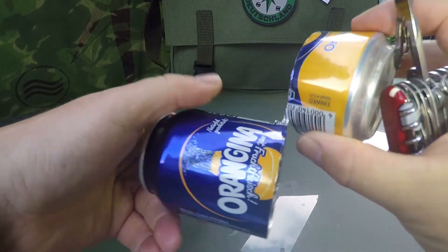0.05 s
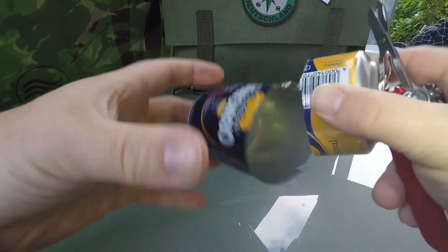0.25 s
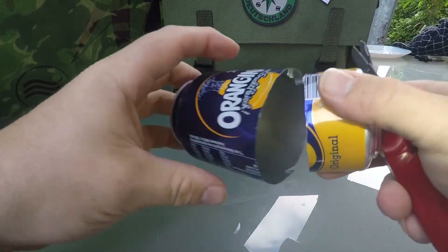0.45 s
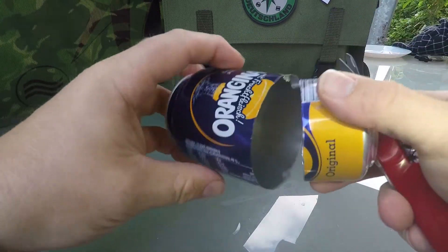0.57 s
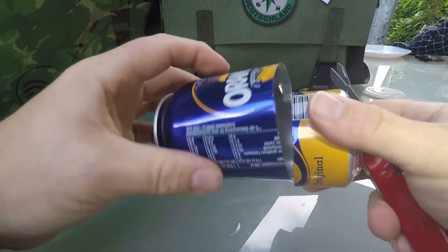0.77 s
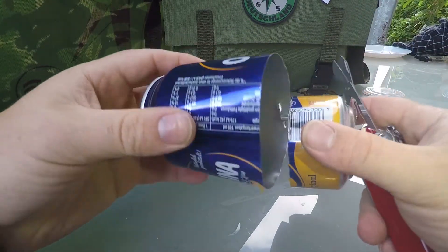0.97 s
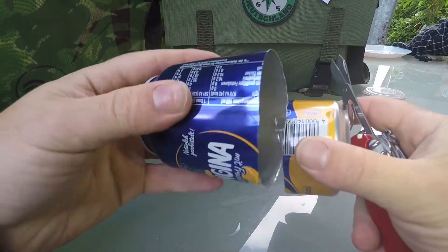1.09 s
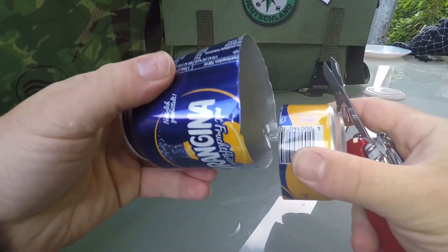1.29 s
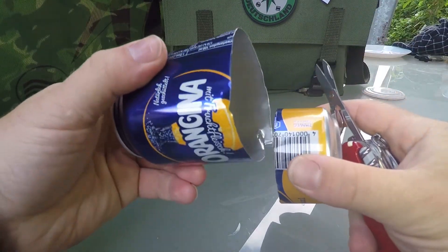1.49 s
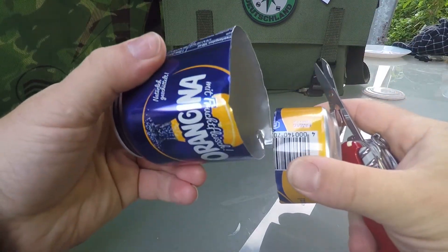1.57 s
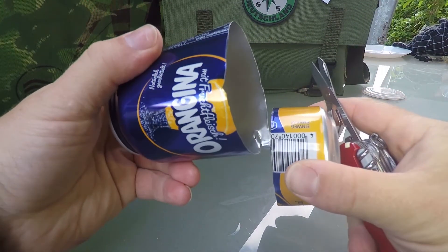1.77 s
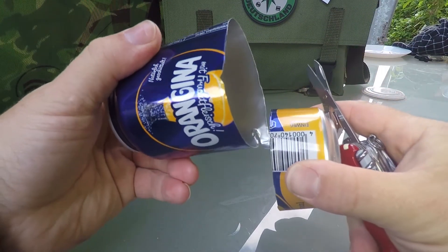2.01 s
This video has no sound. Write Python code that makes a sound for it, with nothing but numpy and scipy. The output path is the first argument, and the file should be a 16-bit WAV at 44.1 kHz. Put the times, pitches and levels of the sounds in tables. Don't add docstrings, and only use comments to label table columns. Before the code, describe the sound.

Aluminium drink can crackling, snapping and tearing in the hands, short squeal, soft final pop

```python
import sys
import numpy as np
from scipy import signal
from scipy.fft import rfft, irfft, next_fast_len
from scipy.io import wavfile
from scipy.ndimage import uniform_filter1d

SR = 44100
rng = np.random.default_rng(int(sys.argv[2]) if len(sys.argv) > 2 else 0)


def amplitude_ratio(level_db):
    exponent = np.asarray(level_db, float) / 20
    return 10 ** exponent


def int16_out(signal):
    q = np.round(np.clip(np.atleast_2d(signal).T, -1, 1) * 32767)
    wavfile.write(sys.argv[1], SR, q.astype(np.int16))


N = 90404


def coloured(points):
    hz, db = np.array(points, float).T
    f = np.fft.rfftfreq(N, 1 / SR) + 1
    gain_db = np.interp(np.log(f), np.log(hz), db, left=-80, right=-80)
    noise = irfft(rfft(rng.standard_normal(N)) * amplitude_ratio(gain_db), N)
    return noise / noise.std()


def curve(rows):
    return np.interp(np.arange(N) / SR, *np.array(rows, float).T)


def walk(rate_hz):
    k = int(SR / rate_hz)
    steps = np.repeat(rng.standard_normal(N // k + 1), k)
    drift = uniform_filter1d(uniform_filter1d(steps, k), k)[:N]
    return drift / drift.std()


def add(out, start_s, sound):
    i = int(start_s * SR)
    out[i:i + len(sound)] += sound[:len(out) - i]


def ring(hz, t60_s):
    t = np.arange(SR // 6) / SR
    decay = np.exp(-np.log(1000) * np.outer(1 / np.maximum(t60_s, .002), t))
    return np.sin(2 * np.pi * np.outer(hz, t)) * decay


def radiate(x, tilt_db):
    high_pass = signal.cheby1(6, .2, 1204, "high", fs=SR, output="sos")
    x = signal.sosfilt(high_pass, x) + amplitude_ratio(-13) * x
    n = next_fast_len(len(x))
    hz = np.fft.rfftfreq(n, 1 / SR) + 300
    return irfft(rfft(x, n) * amplitude_ratio(tilt_db * np.log2(hz / 3000)), n)


def swings(rows):
    out, t = np.zeros(N), np.arange(SR // 6) / SR
    for start_s, db, hz, cycles in rows:
        onset = np.minimum(t * hz, 2)
        x = -np.sin(2 * np.pi * hz * t) * onset * np.exp(-5 * hz * t / cycles)
        add(out, start_s, amplitude_ratio(db) * x / np.abs(x).max())
    return out


def wavering_tones(rows):
    out, t = np.zeros(N), np.arange(8192) / SR
    for start_s, length_s, db, hz, width_hz in rows:
        a, b = uniform_filter1d(rng.standard_normal((2, len(t))), int(SR / width_hz), axis=1)
        blur = (a + 1j * b) / a.std() + 60 / width_hz
        x = np.real(blur * np.exp(2j * np.pi * hz * t)) / np.sqrt(np.mean(np.abs(blur) ** 2) / 2)
        fade = np.clip(np.minimum(t, length_s - t) / 0.0053, 0, 1)
        add(out, start_s, amplitude_ratio(db) * x * fade)
    return out


# pitch in Hz, level in dB per Hz.
RUMBLE_COLOUR = [(12, -26.5), (20, 2), (76, -7.5), (114, -17.5), (193, -25), (400, -32), (520, -66.5),
                 (880, -120)]
# time in seconds, level in dB.
RUMBLE_LEVEL = [
    (0.0, -49),
    (0.22, -42),
    (2.05, -54),
]
# pitch in Hz, level in dB per Hz.
AIR_COLOUR = [(88, -35), (150, -3), (488, -14.5), (528, -15), (618, -14.5), (1820, -21), (2860, -21),
              (14600, -35), (16500, -46.5)]
# time in seconds, level in dB.
RUB_LEVEL = [
    (0.0, -68),
    (0.564, -56),
    (1.45, -76.5),
]


def outdoors():
    rumble = coloured(RUMBLE_COLOUR) * amplitude_ratio(curve(RUMBLE_LEVEL) + 1.5 * walk(9.0))
    hiss = coloured(AIR_COLOUR) * amplitude_ratio(-62 + 0.26 * walk(2.9))
    rub_db = curve(RUB_LEVEL + [(1.87, -96.5)])
    rub = coloured([(700, -10.0), (2000, -10.5), (16000, -21)]) * amplitude_ratio(rub_db + 3.2 * walk(52))
    return rumble + hiss + rub


# start in seconds, length in seconds, level (rms) in dB, pitch in Hz, width in Hz.
BIRD_CALLS = [
    (1.44, .06, -73, 5180, 200),
    (1.56, .05, -70, 2900, 400),
    (1.905, .02, -71, 2730, 100),
    (1.94, .07, -72, 2860, 150),
]


def birds():
    return wavering_tones(BIRD_CALLS)


# start in seconds, peak level in dB, pitch in Hz, number of cycles.
FINGER_THUDS = [(.063, -34.5, 564, 0.86), (0.067, -35.5, 115, 3.4), (0.097, -34.5, 87, 0.83),
                (0.226, -32, 135, 1.96), (0.453, -33.5, 43.6, 1.9), (0.511, -32.5, 154, 0.88),
                (.694, -35.5, 114, 2.4), (0.854, -22.5, 118, 1.13), (0.268, -48, 40.6, 4.7),
                (0.402, -35.5, 40, 3), (0.528, -40, 42, 5.3), (.59, -42, 71, 2.4), (0.971, -26, 94, 1.25),
                (0.99, -37, 250, 0.96), (1.108, -40.5, 44.3, 3.4), (1.134, -29.5, 323, 1.23)]


def thuds():
    return swings(FINGER_THUDS)


# start in seconds, length in seconds, level (rms) in dB,
# pitch in Hz, width in Hz.
EDGE_SQUEAKS = [
    (.132, .034, -52, 1488, 300),
    (.38, .016, -43, 1170, 60.4),
    (.476, 0.03, -55.5, 2170, 61),
    (.795, .02, -47, 1270, 61),
    (1.04, 0.14, -70.5, 3070, 119),
]


def squeaks():
    return wavering_tones(EDGE_SQUEAKS)


# time in seconds, pitch in Hz, level (rms) in dB, roughness from 0 to 1.
STRIP_SQUEAL = [
    (1.1, 2070, -78, .9),
    (1.12, 2020, -62.5, 0.8),
    (1.144, 1950, -71, .9),
    (1.176, 1960, -60.5, 0.96),
    (1.225, 1880, -63, 0.95),
    (1.236, 1864, -71, .3),
    (1.246, 1899, -54, .3),
    (1.278, 1911, -60.5, 0.2),
    (1.314, 1905, -55, 0.4),
]


def squeal():
    t = np.arange(N) / SR
    s, hz, db, rough = np.array(STRIP_SQUEAL).T
    rough = np.clip(np.interp(t, s, rough), 0, 1)
    judder = (walk(400) + 1j * walk(400)) / np.sqrt(2)
    blur = np.sqrt(1 - rough ** 2) + rough * judder
    phase = 2 * np.pi * np.cumsum(np.interp(t, s, hz)) / SR
    tone = np.real(blur * np.exp(1j * phase)) * np.sqrt(2)
    return tone * amplitude_ratio(np.interp(t, s, db)) * (t > s[0]) * (t < s[-1])


# start in seconds, peak level in dB, pitch in Hz, number of cycles.
CREASE_TICKS = [(.018, -42.5, 1750, 10), (.025, -47, 1750, 9), (.032, -45, 1700, 10), (.155, -42, 2670, 16),
                (.27, -25.5, 1220, 14), (.2705, -27, 2700, 13), (.272, -43, 4730, 90),
                (.378, -39.5, 730, 8.8), (.385, -46, 610, 8.6), (.425, -39, 760, 22),
                (.4405, -31.5, 3150, 65), (.4425, -22, 1100, 1.96), (.453, -31, 1800, 3.6),
                (.705, -24, 1880, 6.2), (.7735, -21, 5710, 44), (.817, -28.5, 1500, 2.7),
                (.8705, -27, 515, 1.8), (.912, -49, 2180, 30), (.93, -48, 2230, 28), (.965, -44, 600, 4.2),
                (.988, -39.5, 806, 1.5), (1.126, -41, 1296, 13), (1.134, -35.5, 618, 4.8),
                (1.134, -38, 6370, 34), (1.265, -53.5, 5200, 35), (1.338, -44.5, 4500, 50)]


def ticks():
    return swings(CREASE_TICKS)


# pitch in Hz, level in dB, time to die by 60 dB in seconds.
SHELL_MODES = [
    (1200, -1.5, 0.13),
    (1255, -7.5, .1),
    (1520, -1, 0.059),
    (1880, -6, 0.076),
    (2170, -9.5, .09),
    (2400, -7, .04),
    (3150, -2.5, 0.062),
    (3330, -6, .034),
    (596.7, 8.5, 0.031),
    (760, 1.5, .03),
]
# start in seconds, length in seconds,
# level (rms) in dB, tilt in dB per octave, extra shell ring in dB.
FIRST_TEARS = [(.043, 0.0079, -48, 3, 8), (.0625, 0.018, -51, 3, -15), (.093, 0.007, -46.5, 3.5, -4.5),
               (.128, 0.0026, -45.5, -0.5, -4), (.1855, .003, -48, 0.5, -11.5),
               (.2159, 0.0016, -21.5, 0.5, -7.5), (.22, 0.026, -37, -1, -7), (.269, 0.014, -33, 2, -13),
               (.307, .014, -36.5, 5, -1), (.423, 0.017, -49, -4.5, -8.5), (.4405, .013, -37.5, -0.5, -9),
               (.456, 0.017, -36, 2, -0.5), (.509, 0.0085, -49, -5, 4), (.588, 0.013, -38.5, 2.5, -3.5),
               (.626, 0.0063, -46.5, 3.5, -3.5), (.633, 0.004, -38.5, -2.5, -10)]
# start in seconds, length in seconds,
# level (rms) in dB, tilt in dB per octave, extra shell ring in dB.
SECOND_TEARS = [(.692, 0.0092, -44.5, 0, -8), (0.702, 0.0085, -33, -7, -17),
                (0.7097, 0.011, -19, -1.5, 0.5), (0.7144, 0.015, -24, -1.5, -10),
                (0.7199, 0.011, -27, -2, -20), (0.7295, 0.012, -27, -1, -8), (0.736, 0.014, -29.5, -0.5, 3),
                (0.772, 0.018, -29, 0.5, 0.5), (.778, 0.02, -30, 0.5, -1), (0.8157, 0.0047, -40.5, -9, -12),
                (.85, 0.0085, -40.5, -3, 3), (0.857, 0.0091, -25.5, -2, -5), (0.867, 0.011, -30, -1, -26),
                (0.877, 0.047, -48.5, -2, -19), (.964, 0.0081, -48, 0.5, 2), (0.987, 0.0056, -52, -5.5, 1),
                (1.087, 0.0068, -54.5, 1, 2), (1.123, 0.011, -46, -7, 4), (1.134, 0.0029, -45, 1, -9),
                (1.262, .007, -61.5, 0, -3), (1.314, 0.013, -41, -2.5, -17), (1.333, .024, -55, -3.5, -27)]
# start in seconds,
# length in seconds, level (rms) in dB, tilt in dB per octave, extra shell ring in dB.
EDGE_DRAGS = [(.028, 0.018, -52, 0.5, -2), (.05, 0.015, -50, -2.5, -6), (.128, 0.02, -52, -2, -5.5),
              (.24, 0.032, -46.5, -4, -3.5), (.285, 0.016, -40.5, -3, -19), (.32, 0.039, -52.5, -4.5, -6),
              (.373, 0.015, -39.5, -4, -4.5), (.395, .025, -51, -3, 3), (.47, 0.02, -54, -0.5, -8),
              (.52, .033, -48, 3.5, -10), (.568, 0.015, -46.5, 5, -2), (.64, 0.01, -46.5, 2, -4),
              (.736, 0.011, -28, -2, -4), (.744, .03, -32, 0, -2.5), (.785, 0.017, -38.5, 2, -14),
              (.8, 0.029, -49, 0, -1.5), (.905, 0.028, -59, .5, -6)]


def tear():
    out, many = np.zeros(N), 360
    shell_hz, shell_db, shell_t60 = np.array(SHELL_MODES).T
    place = (np.arange(many) + rng.random(many)) / many
    sheet_hz = 521 + (16293 - 521) * place ** 1.4
    sheet_t60 = 0.025 * (sheet_hz / 4000) ** -.3
    sheet_db = -10.5 - 2 * np.log2(sheet_hz / 4000)
    hz = np.r_[shell_hz, sheet_hz]
    base_db = np.r_[shell_db, sheet_db]
    scatter_db = np.r_[2.5 + 0 * shell_hz, 4.5 + 0 * sheet_hz]
    is_shell = np.arange(len(hz)) < len(shell_hz)
    bank = ring(hz, np.r_[shell_t60, sheet_t60])
    for rows, swells in ((FIRST_TEARS + SECOND_TEARS, False), (EDGE_DRAGS, True)):
        for start_s, length_s, db, tilt_db, ring_db in rows:
            u = np.arange(4096) / (length_s * SR)
            chance, side, size = rng.random((3, 4096))
            on = (chance < 4000 / SR) | (u == 0)
            size_db = -2.5 * np.log(1 - size)
            shape = np.clip(u / 0.45, .1, 1) if swells else amplitude_ratio(-14 * u)
            clicks = on * np.sign(side - .5) * amplitude_ratio(size_db) * shape * (u < 1)
            sign, luck = rng.standard_normal((2, len(hz)))
            mode_db = base_db + ring_db * is_shell + scatter_db * luck
            body = (np.sign(sign) * amplitude_ratio(mode_db)) @ bank
            x = radiate(signal.fftconvolve(clicks, body), tilt_db)
            add(out, start_s, amplitude_ratio(db) * x / np.sqrt(np.sum(x ** 2) / (length_s * SR)))
    return out


# start in seconds, peak level in dB, tilt in dB per octave, push length in ms.
BUCKLES = [
    (0.216, -1, -1.5, 0.082),
    (0.2166, -6.5, 2, 0.22),
    (0.2287, -24, 3, .2),
    (.307, -11, 1, .08),
    (0.8552, -13.5, -0.5, 0.28),
    (1.316, -25.5, 3.5, 0.2),
]
# pitch in Hz, level in dB,
# time to die by 60 dB in seconds.
BUCKLE_MODES = [
    [(2110, -2, 0.0054), (2614, 1.5, 0.0052), (2975, -9.5, 0.011), (3260, -7.5, .022), (1174, -26.5, .07),
     (4900, -21.5, 0.035)],
    [(1240, -1, 0.012), (1800, 2, .011), (3400, -8.5, .012)],
    [(1850, 1, 0.02), (1980, -5.5, 0.049)],
    [(1380, -4, 0.016), (3580, 2.5, 0.014), (3150, -1.5, 0.011), (3990, -9, 0.015), (8000, 0.5, 0.015),
     (9560, -6, 0.029), (13600, -7, 0.015)],
    [(600, 7.5, 0.037), (1254, -12, 0.19), (1170, 1, 0.046), (1528, 4, 0.045), (1750, -13.5, 0.17),
     (1980, -28, 0.22), (359, 2, 0.065), (777, -8.5, 0.062)],
    [(1473, -2.5, 0.06), (2050, 6.5, 0.078), (1954, -11, 0.23), (2240, -8, 0.14), (2600, -8, 0.081),
     (2810, -16, 0.15), (3560, -2, 0.046), (4500, 0, 0.06), (5960, -18, 0.14), (7200, -18, 0.18)],
]


def pops():
    out = np.zeros(N)
    for (start_s, db, tilt_db, push_ms), modes in zip(BUCKLES, BUCKLE_MODES):
        hz, mode_db, t60_s = np.array(modes).T
        push = np.exp(-(np.arange(-30, 31) / (push_ms * SR / 4000)) ** 2)
        rung = np.convolve(amplitude_ratio(mode_db) @ ring(hz, t60_s), push)
        x = radiate(rung[25:], tilt_db)
        add(out, start_s, amplitude_ratio(db) * x / np.abs(x).max())
    return out


def yard_echo(can):
    t = np.arange(SR // 4) / SR
    yard = rng.standard_normal(len(t)) * np.exp(-np.log(1000) * t / .13) * (t > .003)
    return amplitude_ratio(-20) * signal.fftconvolve(can, yard / np.sqrt(np.sum(yard ** 2)))[:N]


def scene():
    can = squeaks() + squeal() + ticks() + tear() + pops()
    mix = outdoors() + birds() + thuds() + can + yard_echo(can)
    return mix[None]


def roll_off(x):
    return signal.sosfilt(signal.butter(12, 16610, fs=SR, output="sos"), x)


def record(dry):
    low_pass = signal.ellip(6, .2, 30, 15400, fs=SR, output="sos")
    mix = signal.sosfilt(low_pass, dry)
    return roll_off(mix)


dry = scene()
out = record(dry)
int16_out(out)
```